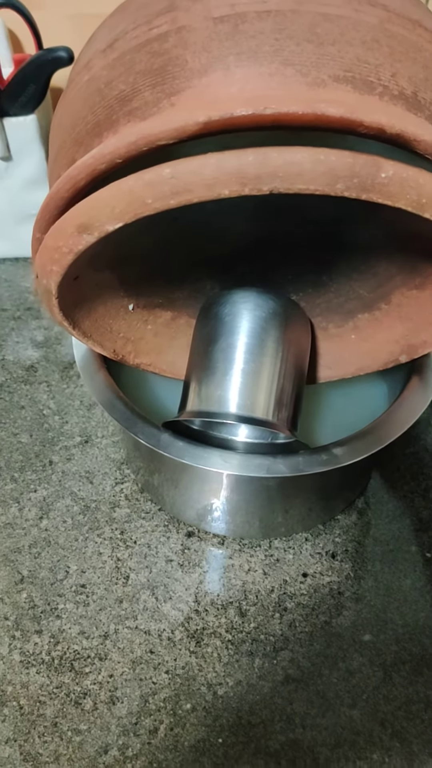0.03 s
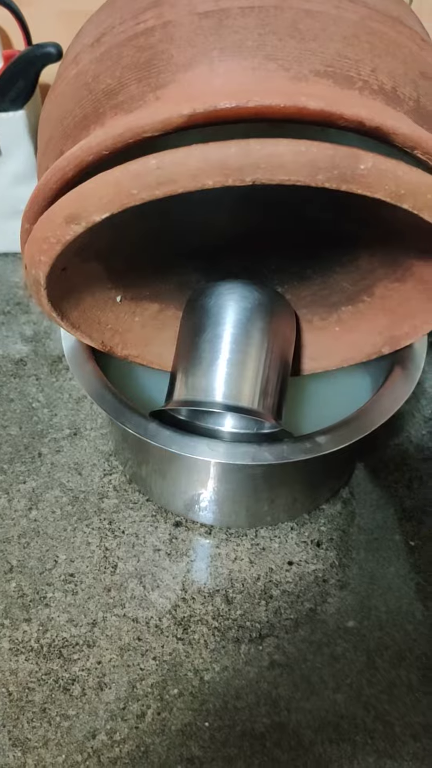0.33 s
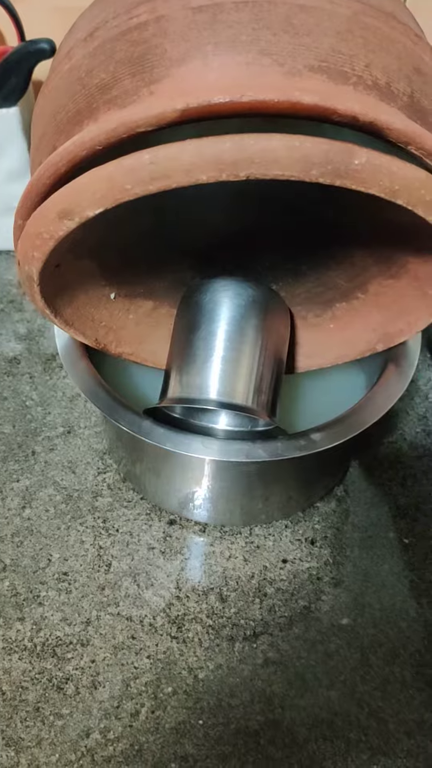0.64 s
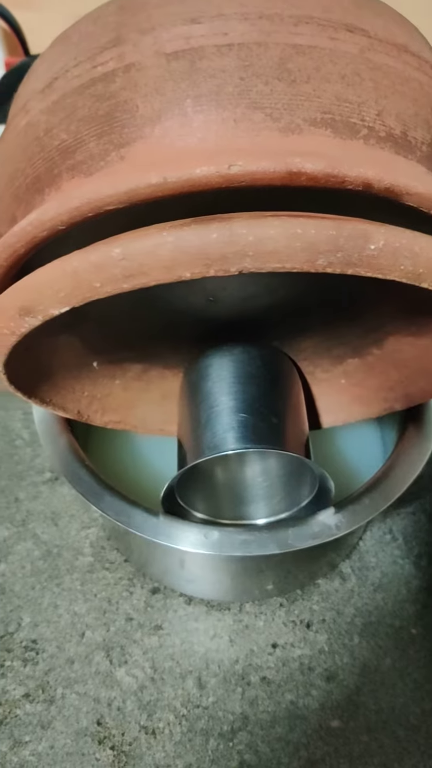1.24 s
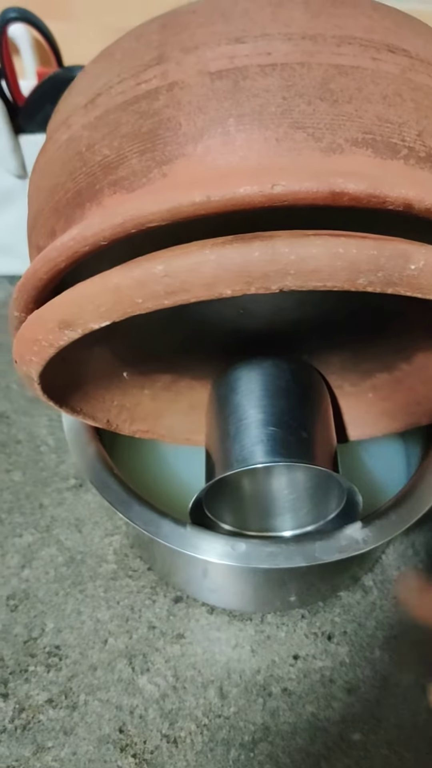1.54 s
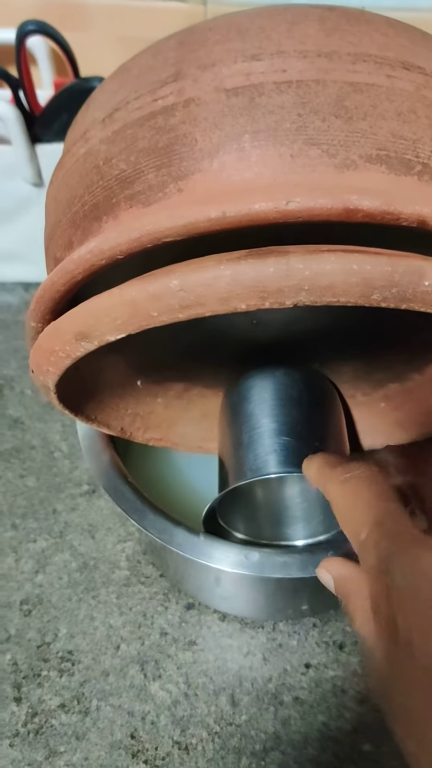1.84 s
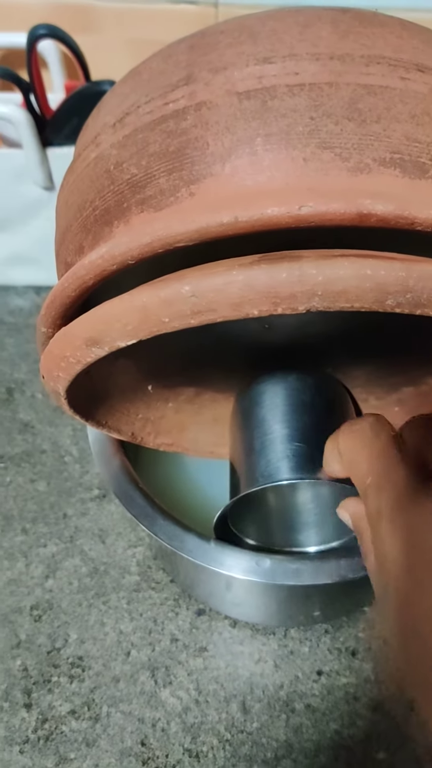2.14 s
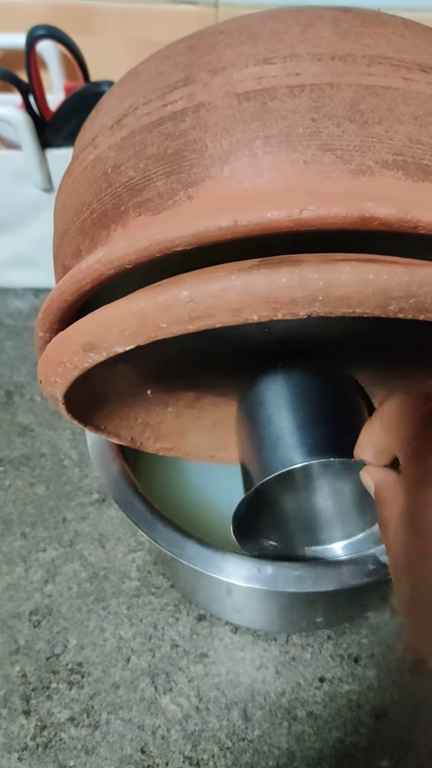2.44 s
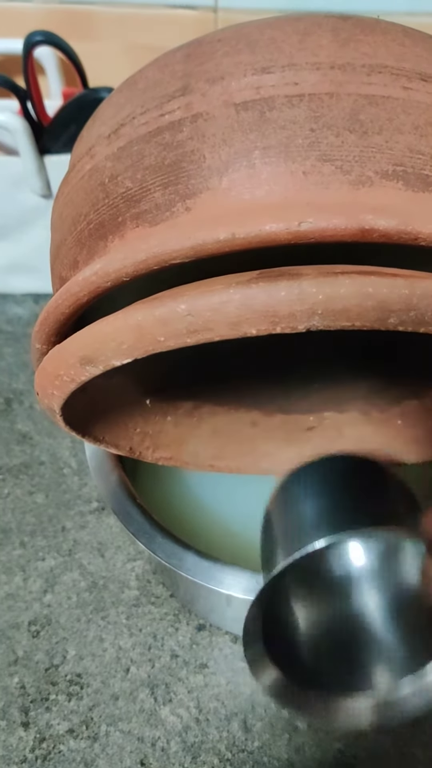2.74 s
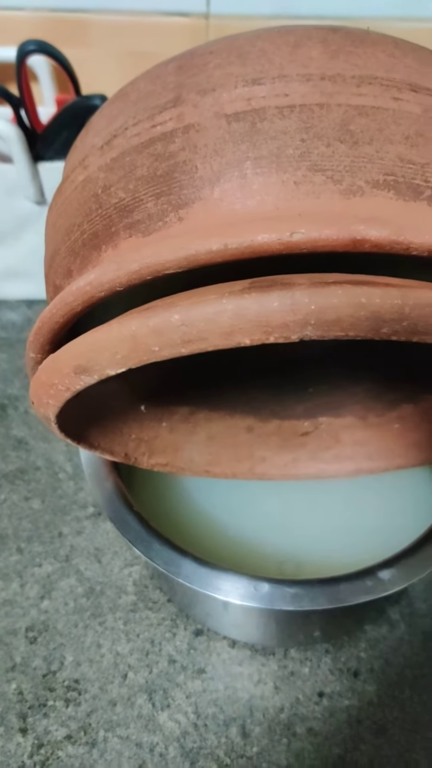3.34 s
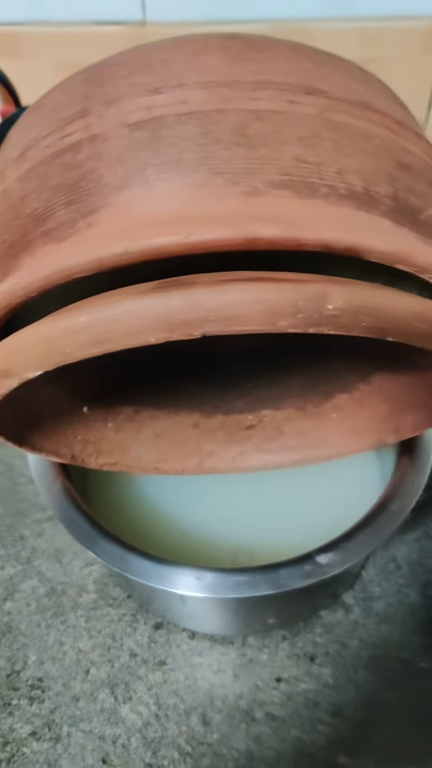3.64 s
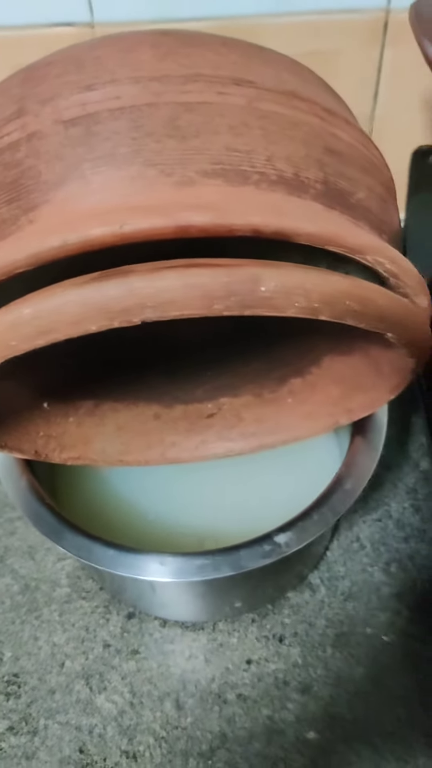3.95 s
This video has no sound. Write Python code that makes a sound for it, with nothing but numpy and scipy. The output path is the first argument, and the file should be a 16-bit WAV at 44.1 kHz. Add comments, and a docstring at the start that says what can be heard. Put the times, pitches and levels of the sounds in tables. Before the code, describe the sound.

A steel tumbler clinks and rattles close by in a kitchen. Water first splashes briefly into a basin and stops; then the tumbler scrapes free between a knocking clay pot and a steel bowl, and is set down.

```python
"""Water splashes into a steel basin in a hard-walled kitchen: drops drive its resonances, bubbles ring,
a utensil clanks, then the hiss stops short. A steel tumbler is worked out from between a clay pot and
a steel bowl: the pot knocks, friction makes the rim scrape and sing, and the struck steel clinks in its
natural modes. Last, the tumbler is set down and rattles to rest under a hand. Two spaced microphones
close by hear it all over a low rumble and hum."""
import sys
import numpy as np
from scipy import signal
from scipy.fft import rfft, irfft
from scipy.io import wavfile
from scipy.ndimage import uniform_filter1d

SR = 44100
rng = np.random.default_rng(int(sys.argv[2]) if len(sys.argv) > 2 else 0)


def inscribe(sig):
    """Save sig as 16-bit PCM at rate SR to the path in sys.argv[1].

    A 1-D sig is mono; a 2-D sig holds one channel per row.
    Samples are clipped to [-1, 1] before scaling.
    """
    pcm = np.round(np.clip(np.atleast_2d(sig).T, -1, 1) * 32767)
    wavfile.write(sys.argv[1], SR, pcm.astype(np.int16))


N = 176400
TIME = np.arange(N) / SR


def amp(db):
    """Decibels to amplitude ratio."""
    return 10 ** (np.asarray(db) / 20)


def unit_rms(x):
    """Normalisation to unit power."""
    return x / np.sqrt(np.mean(x ** 2) + 1e-20)


def unit_energy(x):
    """Normalisation to unit energy per channel, on average over the channels."""
    return unit_rms(x) / np.sqrt(x.shape[-1])


def curve_at(points, hz):
    """Interpolation on a log-frequency axis."""
    f, value = np.transpose(points)
    return np.interp(np.log(hz + 1), np.log(f), value)


def envelope(points):
    """Amplitude envelope, linear in dB between points."""
    return amp(np.interp(TIME, *np.transpose(points)))


def add(mix, start_s, sound):
    """Superposition of a sound on the mix."""
    part = mix[:, max(round(start_s * SR), 0):][:, :sound.shape[1]]
    part += sound[:, :part.shape[1]]


def clicks(per_s, spread_db):
    """Shot noise: independent tiny impacts of uneven size."""
    impulses = (rng.random(N) < per_s / SR) * rng.choice([-1, 1], N)
    return impulses * amp(spread_db * np.minimum(rng.exponential(1, N), 4))


def brightness(hz, tilt_db, pivot_hz=3300):
    """Spectral tilt of a contact in dB, from a slope per octave."""
    return tilt_db * np.log2(np.maximum(hz, 300) / pivot_hz)


def ripple(hz, depth_db=4, width_hz=110, full_hz=1500):
    """Each contact point weights the overtones differently: random peaks and dips, more in the treble."""
    bump = np.exp(-((hz - hz.mean()) * 2 / width_hz) ** 2)
    bumps = signal.fftconvolve(rng.standard_normal(len(hz)), bump, "same")
    return depth_db * np.minimum(hz / full_hz, 1) * np.clip(unit_rms(bumps), -2, 2)


def coloured(x, tone, tilt_db=0, peak_hz=None, peak_db=0, rippled=True, size=4096):
    """Minimum-phase filter: a body's spectrum, with optional ripple, tilt and one favoured resonance."""
    hz = np.fft.rfftfreq(size, 1 / SR)
    uneven = amp(ripple(hz) * rippled)
    gain = amp(curve_at(tone, hz)) * uneven / np.sqrt(uniform_filter1d(uneven ** 2, size=70))
    if peak_hz:
        gain = gain * amp(peak_db / (1 + ((hz - peak_hz) / 214) ** 2))  # half-width 214 Hz
    cepstrum = irfft(np.log(unit_rms(gain) * amp(brightness(hz, tilt_db))))
    cepstrum[1:size // 2] *= 2  # folding the cepstrum makes the filter causal
    cepstrum[size // 2 + 1:] = 0
    response = irfft(np.exp(rfft(cepstrum)))
    return signal.oaconvolve(x, response[None], axes=1)[:, :x.shape[1]]


# Each row: frequency in Hz, correlation between the microphones.
COHERENCE = [(120, .96), (400, .88), (600, .25), (850, -.15), (1300, -.25), (3000, -.12), (8000, 0)]
def diffuse(size):
    """Diffuse-field noise: alike at two spaced points only for long waves."""
    a, b = rfft(rng.standard_normal((2, size)))
    same = np.clip(curve_at(COHERENCE, np.fft.rfftfreq(size, 1 / SR)), -1, 1)
    return irfft(np.array([a, same * a + np.sqrt(1 - same ** 2) * b]), size)


# Each row: frequency in Hz, reverberation time in seconds.
KITCHEN_T60 = [(150, 0.96), (500, 0.38), (1200, 0.36), (3000, 0.57), (5000, 0.39), (9000, 0.41),
               (15000, 0.31)]
def kitchen_tail(size=24576, build_s=0.0042):
    """Reverberation: reflections build up, then each band decays exponentially at its own rate."""
    hz, t, bands = signal.stft(diffuse(size), SR, nperseg=256)
    decay = amp(-60 * t / curve_at(KITCHEN_T60, hz)[:, None])
    tail = signal.istft(bands * decay, SR)[1][:, :size]
    return unit_energy(tail * (1 - np.exp(-np.arange(size) / SR / build_s)))


def in_room(x, room_db=5.5):
    """Direct sound plus the reverberant field, by convolution."""
    return x + amp(room_db) * signal.oaconvolve(x[None], kitchen_tail(), axes=1)[:, :N]


CRACK_S, MODE_SPLIT_HZ = 0.0027, 11
PRESS_FROM_S, PRESS_DB_PER_S = 3.39, 33  # the hand stills the tumbler: later blows get less ring and room
def blows(rows, tone, modes, dense_db, dense_t60, room_db, modes_db, rippled=True, size=24576):
    """Impact and free decay: a crack, then dense ring, room and beating modes at levels relative to it."""
    out, t = np.zeros((2, N)), np.arange(size) / SR
    for start_s, db, tilt_db, pan_db, *peak in rows:
        pressed_db = -PRESS_DB_PER_S * max(start_s - PRESS_FROM_S, 0)
        crack = unit_energy(diffuse(size) * np.exp(-t / CRACK_S))
        dense = unit_energy(diffuse(size) * np.exp(-np.log(1000) * t / dense_t60))
        noise = crack + amp(dense_db) * dense + amp(room_db + pressed_db) * kitchen_tail()
        body = coloured(noise, tone, tilt_db, *peak, rippled=rippled)
        ring, energy = 0, 0
        for hz, mode_db, t60 in modes:
            fade = amp(mode_db) * np.exp(-np.log(1000) * t / t60)
            phase = rng.random((2, 2, 1))
            twin_hz = hz + MODE_SPLIT_HZ * rng.normal()
            twin = .5 * np.sin(2 * np.pi * (twin_hz * t + phase[1]))
            pair = np.sin(2 * np.pi * (hz * t + phase[0])) + twin
            ring += fade * pair * amp(brightness(hz, tilt_db))
            energy += np.sum(fade ** 2) / 2
        ring *= amp(modes_db + pressed_db) / np.sqrt(energy) * (1 - np.exp(-t / CRACK_S))
        add(out, start_s, (body + ring) * amp([[db + pan_db / 2], [db - pan_db / 2]]))
    return out


# Each row of a spectrum, here and below: frequency in Hz, relative level in dB.
POT_SPECTRUM = [(80, -34), (190, -19), (350, -13), (550, -4), (800, -3), (1200, 2.5), (1450, -3.5),
                (1800, -16.5), (2200, -18), (2650, -15), (3300, -20), (5200, -18), (6100, -33.5),
                (10000, -42.5), (15500, -47)]
# Each row of a mode table: frequency in Hz, relative level in dB, time to fall 60 dB in seconds.
POT_MODES = [(310, -21.5, 0.84), (621, -3, 0.37), (785, -7, 0.18), (939, -3, 0.53), (1010, 5, 0.19),
             (1142, -4, 0.47), (1240, -2, 0.49), (1279, -27, 2), (1320, -1, 0.45), (1432, -7, 0.33)]
# Each row of a blow table: start in seconds, strength in dB, tilt in dB per octave, left over right
# in dB and, where given, a favoured resonance in Hz and its lift in dB.
POT_BLOWS = [(.9335, -7, -0.5, 0.2, 586, 3.3), (.9465, -8, 0, 0, 1150, 2.5),
             (1.9075, -11, -1.5, 0.54, 1250, 3.4), (2.295, -23.5, -2.5, 0.2, 162, 19.7),
             (2.3735, 0, 0, 1.5, 750, 4), (2.4405, -7, 1, 1.9, 260, 9), (2.462, -3, 1, 0, 1290, 14),
             (2.5515, -12.5, -1.5, 0.26, 820, 10.8)]
def pot_knocks():
    """Damped vibration: struck clay gives a short knock with low modes."""
    return blows(POT_BLOWS, POT_SPECTRUM, POT_MODES,
                 dense_db=3, dense_t60=.04, room_db=7.74, modes_db=3.1, rippled=False)


# The steel tumbler's spectrum, modes and blows, with rows as for the pot.
TUMBLER_SPECTRUM = [(300, -11), (1800, -3.5), (2800, -5.5), (3500, -2.5), (4250, -15), (5200, 3.5),
                    (6200, -12.5), (8300, -8.5), (9700, -13), (11300, -15.5), (12800, -17.5), (15500, -10)]
TUMBLER_MODES = [(3300, -2.5, 0.33), (3680, 6, 0.33), (5200, -6, 0.24), (5700, -9, 0.38),
                 (6540, -10.5, 0.61), (8064, -6, 0.21), (11200, -10, .28)]
TUMBLER_BLOWS = [(1.907, -15.5, 3, 0.34, 3300, 21), (2.4392, -4.5, -3, 0, 3850, 5.6),
                 (2.552, -18.5, -5.5, 1.2, 4940, 17)]
def tumbler_clinks():
    """Shell vibration: a small, stiff steel wall rings in high inharmonic modes."""
    return blows(TUMBLER_BLOWS, TUMBLER_SPECTRUM, TUMBLER_MODES,
                 dense_db=4.3, dense_t60=.15, room_db=5.7, modes_db=1.8)


# The steel bowl's spectrum, modes and blows, with rows as for the pot.
BOWL_SPECTRUM = [(90, -17), (190, -12), (450, -13), (1100, -7.5), (1800, -9), (2700, 2.5), (3500, -4.5),
                 (4400, -25), (5300, -5.5), (6400, -25), (7600, -22), (8600, -32), (15500, -34)]
BOWL_MODES = [(2570, 2, 0.42), (2860, 12.5, 0.31), (5420, 9, 0.2), (6800, -13, 0.29), (7560, -4, 0.36)]
BOWL_BLOWS = [(2.311, -12.5, 0.19, 1.9, 5230, 16), (2.335, -9, 0.31, 0.51, 2570, 9)]
def bowl_clinks():
    """Bending modes: the struck bowl rings like a brief bell."""
    return blows(BOWL_BLOWS, BOWL_SPECTRUM, BOWL_MODES,
                 dense_db=1.8, dense_t60=.046, room_db=10.6, modes_db=5.9)


# The rim scraping along the bowl, and its singing. Each row: time in seconds, level in dB.
SCRAPE_LEVEL = [(1.85, -62), (2.05, -54), (2.23, -41.5), (2.27, -50), (2.31, -51)]
SING_LEVEL = [(1.85, -69), (2.0, -51), (2.13, -64.5), (2.2, -41.5), (2.31, -45.5)]
def rim_scrape(sing_hz=3336, sing_width_hz=16):
    """Stick-slip friction: tiny slips shake tumbler and pot, and make one rim mode sing."""
    slips = in_room(clicks(per_s=430, spread_db=-3.5), room_db=6.5)
    pole = np.exp((2j * np.pi * sing_hz - np.pi * sing_width_hz) / SR)
    mode = signal.lfilter([1], [1, -pole], slips)
    sing = unit_rms(mode.real / np.sqrt(abs(mode) + 1e-9))  # compression steadies the tone
    steel = unit_rms(coloured(slips, TUMBLER_SPECTRUM, tilt_db=3.5))
    clay = amp(-1.5) * unit_rms(coloured(slips, POT_SPECTRUM))
    sliding = (TIME > SCRAPE_LEVEL[0][0]) & (TIME < SCRAPE_LEVEL[-1][0])
    gate = uniform_filter1d(1. * sliding, size=1500)
    return ((steel + clay) * envelope(SCRAPE_LEVEL) + sing * envelope(SING_LEVEL)) * gate


# Spectra, modes and blows of the rocking rim and of the surface below it, with rows as for the pot.
RIM_SPECTRUM = [(100, -41), (700, -26), (1350, -35.5), (2100, -35), (2750, -25.5), (3250, -8.5),
                (4150, -22), (4850, 1.5), (5350, -9), (5900, -16.5), (6650, -21.5), (7200, -14),
                (7700, -16.5), (8400, -15.5), (9300, -20), (11000, -21.5), (13500, -26.5), (15500, -18)]
RIM_MODES = [(3246, 6, 0.31), (3470, -3, 0.22), (4830, 9.5, 0.1), (5040, 10, 0.3), (5200, -9, 0.15),
             (7230, 2, .2), (15390, -17.5, .18)]
RIM_BLOWS = [(3.0417, 1, -4, -0.5, 3180, 4.5), (3.1832, -3.5, 1.5, 0, 7570, 12),
             (3.2063, -8.5, -1.5, -6, 4800, 8), (3.2262, 3.5, 0.5, -4, 5340, 10),
             (3.241, -11, -3, 0, 3180, 11.5), (3.276, 1.5, -2.5, -0.5, 7860, 21),
             (3.3233, -0.5, -2, -6, 5130, 7), (3.336, -6.5, 0, 1.5, 4800, 5),
             (3.3749, -8.5, -3.5, 0, 3840, 27), (3.3879, 3, 1.5, -0.5, 4840, 10),
             (3.396, -2.5, 1, 1, 4850, 7), (3.4082, 4.5, -0.5, 0.5, 7240, 14.5),
             (3.5087, -14, 2.5, -10.5, 3520, 27), (3.536, -3.5, 1.5, -4, 4900, 8.5),
             (3.551, -6.5, -5.5, 0.5, 4800, -4), (3.6335, -1.5, -1.5, 0, 5310, 12),
             (3.7446, -16.5, -6.5, -1.5, 4800, 0)]
SURFACE_SPECTRUM = [(100, -17), (400, -9), (700, -9.5), (1000, 0.5), (1400, -23.5), (2100, -33), (6000, -35)]
SURFACE_MODES = [(920, -2, 0.23), (1042, 0, 0.21)]
BASE_BLOWS = [(3.558, -9.5, 1.1, 0)]
# Grit under the rim. Each row: time in seconds, level in dB.
GRIT_LEVEL = [(3.18, -110), (3.2, -38.5), (3.42, -47), (3.6, -52), (3.68, -110)]
def tumbler_set_down():
    """Repeated impact: the rim ticks on the counter and grinds over grit; the surface below answers dully."""
    grains = in_room(clicks(per_s=150, spread_db=1.5), room_db=-7)
    grit = unit_rms(coloured(grains, RIM_SPECTRUM, tilt_db=-2.5))
    ticks = blows(RIM_BLOWS, RIM_SPECTRUM, RIM_MODES,
                  dense_db=-5, dense_t60=.54, room_db=-1, modes_db=-5.5)
    # All but the last two ticks bring a light thud that slightly follows their strength.
    surface_blows = [(s, -19 + 0.1 * db, 0, pan_db) for s, db, _, pan_db, *_ in RIM_BLOWS[:-2]]
    thuds = blows(surface_blows + BASE_BLOWS, SURFACE_SPECTRUM, SURFACE_MODES,
                  dense_db=-1, dense_t60=.7, room_db=5.5, modes_db=4)
    return ticks + grit * envelope(GRIT_LEVEL) + thuds


WATER_STOP_S, DROPS_PER_S, DROP_SPREAD_DB = .568, 7000, 1.5
# Drops on steel. Each row: frequency in Hz, relative level in dB.
SPRAY_SPECTRUM = [(100, -18.5), (300, -8), (700, -4), (1300, -14), (1900, -6.5), (3500, -1), (4300, -4.5),
                  (5100, 5), (5800, -9.5), (8000, -10), (10000, -15), (15500, -13.5)]
# Each row: time in seconds, level in dB.
SPRAY_LEVEL = [(0, -35), (.35, -35.5), (.455, -38), (.475, -37.5), (.56, -39)]
def spray(patch_db=3):
    """Shot noise: drop impacts merge into a hiss, patchy in time and frequency as the jet wanders."""
    hiss = coloured(in_room(clicks(DROPS_PER_S, DROP_SPREAD_DB)), SPRAY_SPECTRUM, rippled=False)
    bands = signal.stft(hiss, nperseg=512)[2]
    patches = uniform_filter1d(rng.standard_normal(bands.shape[1:]), size=4, axis=0)
    patches = unit_rms(uniform_filter1d(patches, size=7, axis=1))
    patchy = signal.istft(bands * amp(patch_db * patches))[1][:, :N]
    return unit_rms(patchy) * envelope(SPRAY_LEVEL)


def basin_resonance(hz, width_hz, wander=.025):
    """Forced vibration: drops sustain one basin mode while moving water bends its pitch."""
    drift = unit_rms(uniform_filter1d(uniform_filter1d(rng.standard_normal(N), size=3000), size=3000))
    carrier = np.exp(2j * np.pi * np.cumsum(hz * (1 + wander * drift)) / SR)
    r = np.exp(-np.pi * width_hz / SR)
    amplitude = signal.lfilter([1], [1, -2 * r, r * r], clicks(DROPS_PER_S, DROP_SPREAD_DB) / carrier)
    return unit_rms(in_room(unit_rms((carrier * amplitude).real)))


def bubbles(low_hz, high_hz, per_s=160, decay_cycles=11, rise=0.057):
    """Bubble resonance: air trapped in the splash pulsates in short rising chirps."""
    out, t = np.zeros((1, N)), np.arange(2048) / SR
    for when, pitch, strength in rng.random((int(per_s * WATER_STOP_S), 3)):
        hz = low_hz * (high_hz / low_hz) ** pitch
        age = hz * t / decay_cycles
        chirp = np.exp(-age) * np.sin(2 * np.pi * hz * t * (1 + rise * age / 2))
        add(out, when * WATER_STOP_S, strength * chirp[None])
    wet = in_room(out[0])
    return wet / wet[:, :int(WATER_STOP_S * SR)].std()


# The ringing basin wall and the gurgle. Each row: time in seconds, level in dB.
WALL_LEVEL = [(.08, -50), (.12, -39), (.4, -42), (.455, -51.5), (.475, -36), (.56, -54)]
GURGLE_LEVEL = [(0, -37.5), (.06, -40.5), (.15, -49.5), (.26, -43.5), (.32, -34.5), (.39, -43.5),
                (.42, -38), (.48, -48.5), (.56, -51)]
# The basin's spectrum and modes and the utensil's blows, with rows as for the pot.
BASIN_SPECTRUM = [(100, -22.5), (350, -10), (520, 11), (750, -10.5), (1200, -19.5), (2050, 3), (3100, -8.5),
                  (4900, 3.5), (6000, -10.5), (6900, -4), (8300, 1.5), (9300, -13), (10300, -11),
                  (11300, 1.5), (12600, -10.5), (13500, -23.5), (14400, -9), (15600, 0)]
BASIN_MODES = [(525, 3, 0.5), (2000, -4, .25), (2705, -0.5, .22), (4820, 3, 0.57)]
UTENSIL_BLOWS = [(.1635, -0.43, -0.046, 1), (.175, -1.5, 1.5, 1.8)]
def sink(stop_fade_s=0.0048):
    """Forced and free vibration: water drives the basin, a utensil strikes it; all stops at once."""
    hiss = spray()
    belly = basin_resonance(hz=505, width_hz=17) * amp(-51.5)
    wall = basin_resonance(hz=4850, width_hz=360) * envelope(WALL_LEVEL)
    gurgle = (bubbles(600, 1100) + amp(-4) * bubbles(1300, 2150)) * envelope(GURGLE_LEVEL)
    clanks = blows(UTENSIL_BLOWS, BASIN_SPECTRUM, BASIN_MODES,
                   dense_db=8.5, dense_t60=.14, room_db=7.4, modes_db=4.5)
    return (hiss + belly + wall + gurgle + clanks) * np.clip((WATER_STOP_S - TIME) / stop_fade_s, 0, 1)


# Each row: start in seconds, strength in dB, tilt in dB per octave, left over right in dB.
SETTLING_BLOWS = [(.65, -32, -3, 2.5), (1.495, -36.5, -1, 3)]
def settling_taps():
    """Weak impacts: the stack settles with faint, dull taps that decay slowly."""
    return blows(SETTLING_BLOWS, SPRAY_SPECTRUM, POT_MODES,
                 dense_db=6, dense_t60=1.8, room_db=2, modes_db=-6)


# Room rumble, and the tones of mains and fan. Each row: frequency in Hz, relative level in dB.
RUMBLE_SPECTRUM = [(12, -24.5), (22, -2.5), (60, -7.5), (130, -17), (180, -8.5), (235, -28), (310, -17.5),
                   (950, -29.5), (4200, -36.5), (5050, -32), (6000, -46), (15500, -45.5)]
HUM_TONES = [(100, -64), (176, -70.5), (312, -70)]
def background():
    """Ambient noise: a diffuse low rumble with a faint line spectrum of hum."""
    gain = amp(curve_at(RUMBLE_SPECTRUM, np.fft.rfftfreq(N, 1 / SR)))
    rumble = unit_rms(irfft(rfft(diffuse(N)) * gain, N))
    hum = sum(amp(db) * np.sqrt(2) * np.sin(2 * np.pi * (hz * TIME + rng.random()))
              for hz, db in HUM_TONES)
    return (amp(-56.5) * rumble + hum) * amp([[.7], [-.9]])


def scene():
    """Superposition: the sink, the tumbler worked free and the tumbler set down, over the room's noise."""
    knocks = pot_knocks() + tumbler_clinks() + bowl_clinks()
    return background() + settling_taps() + sink() + rim_scrape() + knocks + tumbler_set_down()


# Each row: frequency in Hz, gain of the left-right difference in dB.
STEREO_WIDTH = [(120, -0.5), (250, 0), (400, -2.5), (650, 0)]
# Each row: frequency in Hz, left over right in dB.
MIC_BALANCE = [(100, 1), (600, -1.1), (1500, 2), (3000, 2.5), (5500, 3.5), (9000, -3.5), (14000, -3)]
def record(dry, cutoff_hz=15800):
    """Spaced-pair pickup: the left-right difference is narrowed in the low range, the microphones differ in
    colour, and band-limit."""
    hz = np.fft.rfftfreq(2 * N, 1 / SR)
    spectra = rfft(dry, 2 * N)
    middle = spectra.mean(0)
    sides = (spectra - middle) * amp(curve_at(STEREO_WIDTH, hz))
    balance_db = curve_at(MIC_BALANCE, hz)
    heard = irfft((middle + sides) * amp([balance_db / 2, -balance_db / 2]))[:, :N]
    lowpass = signal.firwin(511, cutoff_hz, window=("kaiser", 9), fs=SR)
    return signal.oaconvolve(heard, lowpass[None], "same")


dry = scene()
out = record(dry)
inscribe(out)
```